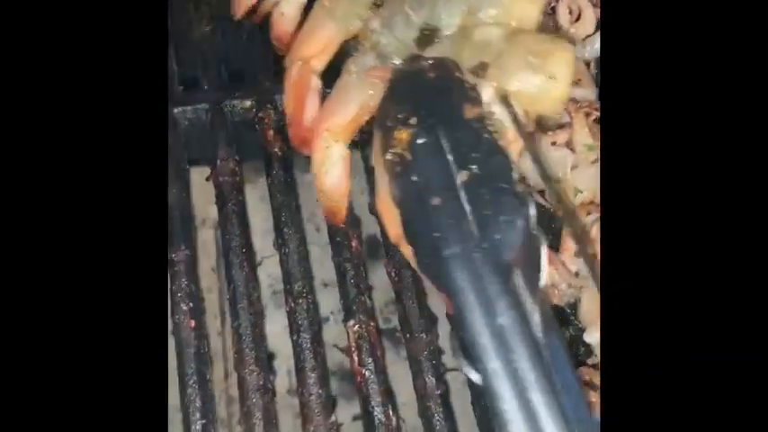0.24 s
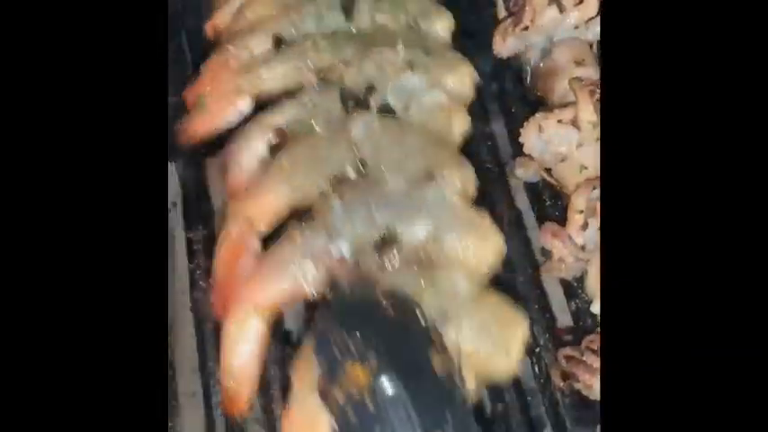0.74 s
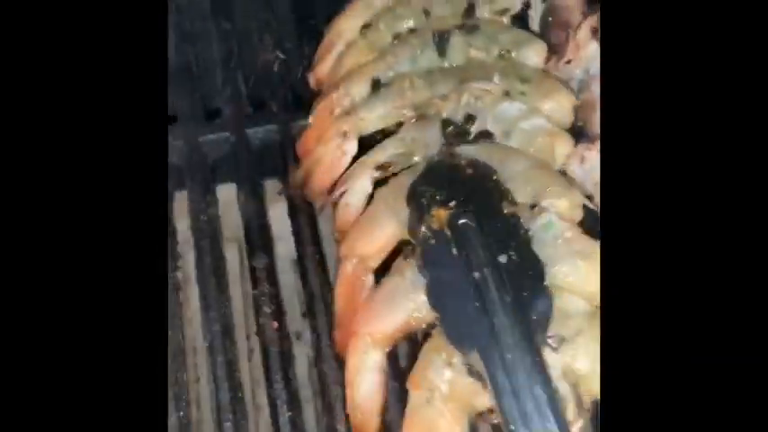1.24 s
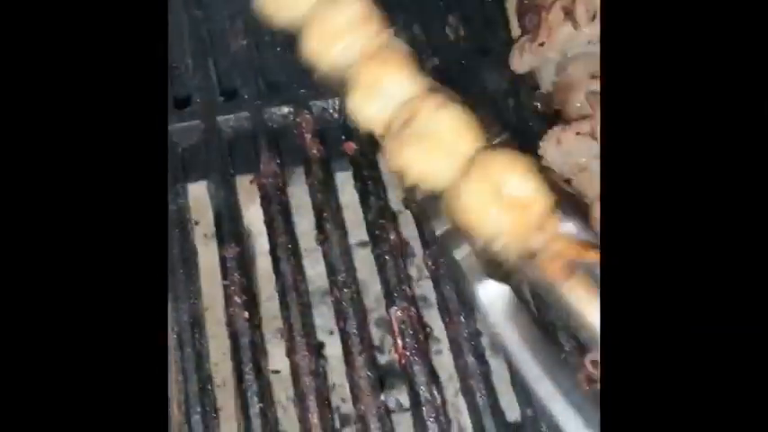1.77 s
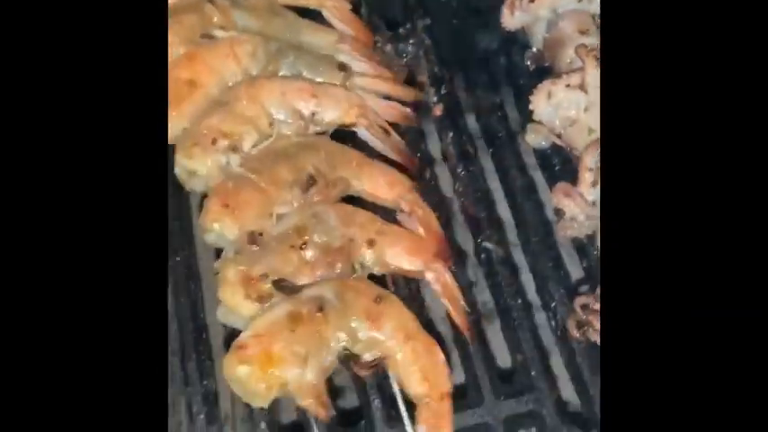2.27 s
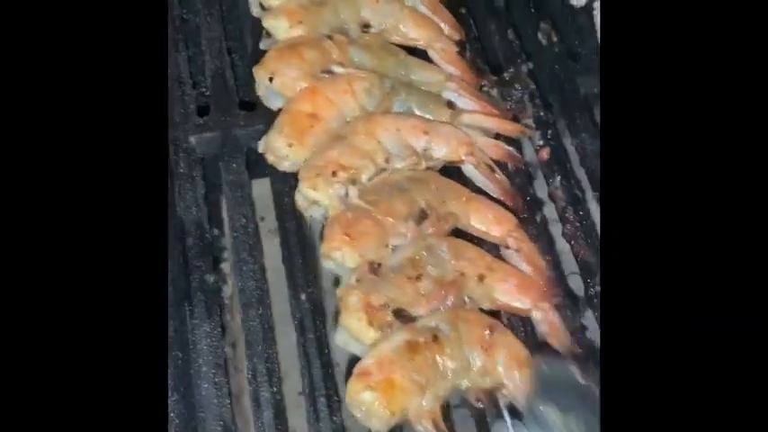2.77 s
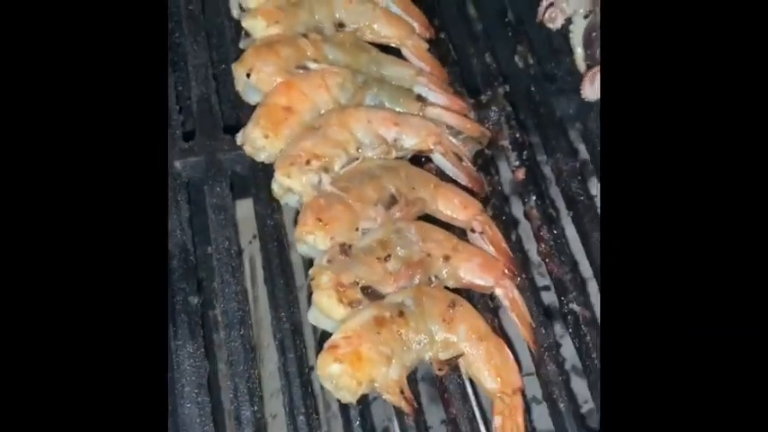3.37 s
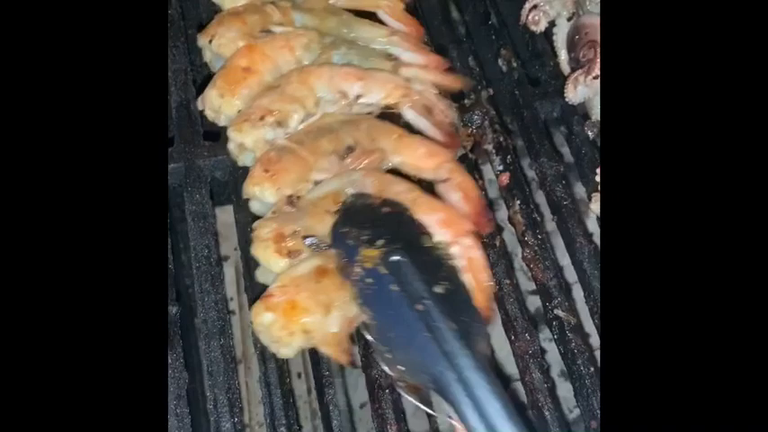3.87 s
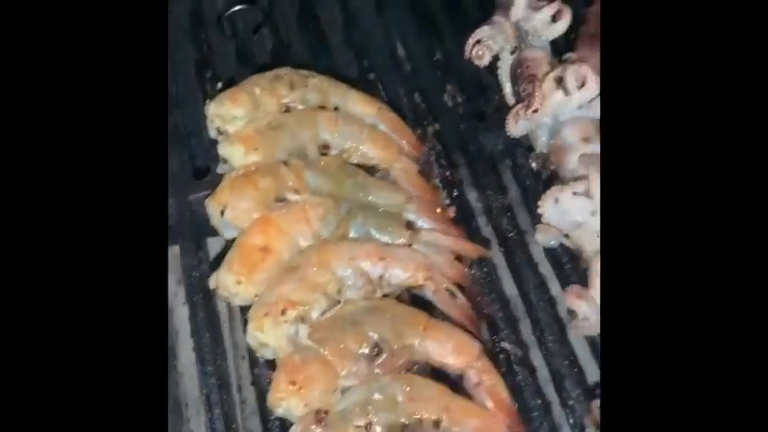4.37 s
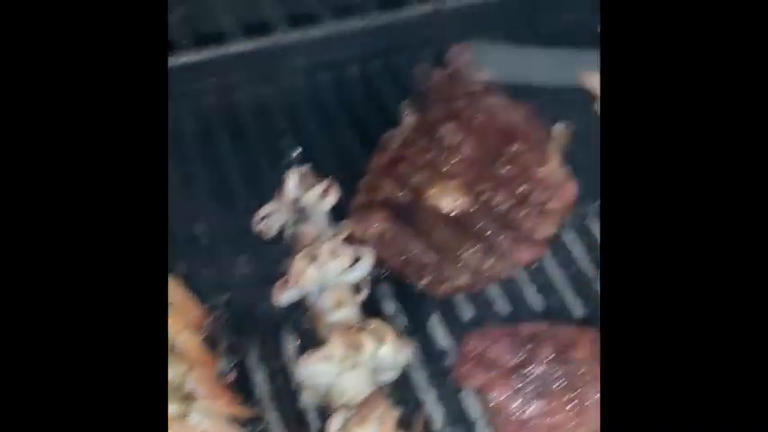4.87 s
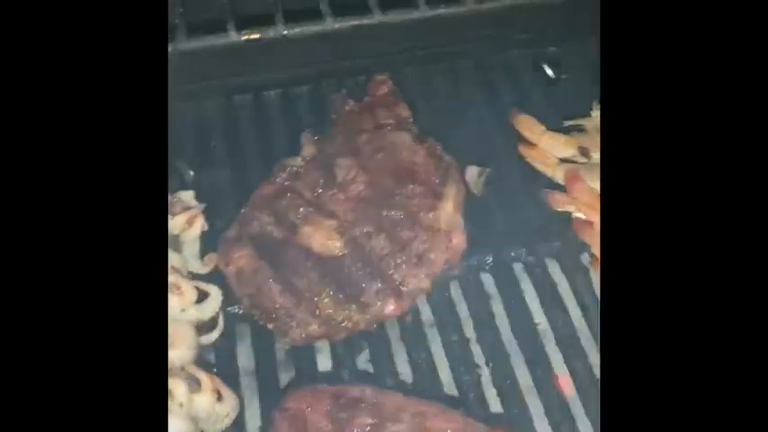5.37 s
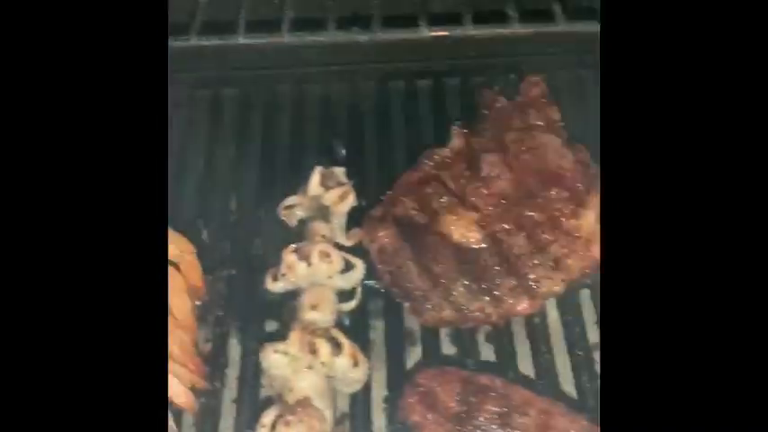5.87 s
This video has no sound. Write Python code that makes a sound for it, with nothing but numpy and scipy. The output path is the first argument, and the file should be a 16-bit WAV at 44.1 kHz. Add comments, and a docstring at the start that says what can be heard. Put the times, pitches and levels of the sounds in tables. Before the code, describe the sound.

A close stereo microphone over a hot grill catches bright steamy hiss, tiny bubbling and snapping fat. Steel tongs give high, brief clicks and gritty scrapes, and thump the metal bars with boomy, rattling knocks, busiest between two and three and a half seconds. A low burner roar and light breeze sit underneath. Contacts thin out later, leaving sizzling and pops, and loud hits slightly press the level down.

```python
"""Shrimp sizzle on a hot grill outdoors: bubbling hiss with fat pops, each a snap of noise and a longer spray.
Steel tongs click, scrape along the bars and knock the grate: noise bursts and rubbing drive steel resonances,
and blows set off decaying sine modes, the long bar tone humming on. Breeze and burner rumble below as shaped noise.
Two close microphone ports, gain control and a hard ceiling take it all in."""
import sys
import numpy as np
from scipy import signal
from scipy.fft import rfft, irfft, next_fast_len
from scipy.io import wavfile
from scipy.ndimage import uniform_filter1d, map_coordinates

SR = 44100
rng = np.random.default_rng(int(sys.argv[2]) if len(sys.argv) > 2 else 0)


def decibels_to_gain(level_db):
    """Convert a level in decibels to a linear amplitude gain (20 dB per decade)."""
    exponent = np.asarray(level_db, float) / 20
    return 10 ** exponent


def waveform_to_disk(signal):
    """Save audio, clipped to [-1, 1], as 16-bit WAV at the path in sys.argv[1]."""
    frames = np.transpose(np.atleast_2d(signal))
    scaled = np.clip(frames, -1, 1) * 32767
    samples = np.round(scaled).astype(np.int16)
    wavfile.write(sys.argv[1], SR, samples)


N = 269773
T = np.arange(N) / SR

# burner and breeze outdoors: (time [s], burner and air level [dB], breeze level [dB])
OUTDOOR_LEVELS = [(0.0, -35.5, -41), (0.31, -35.5, -47), (0.55, -36, -43), (0.7, -31, -46),
                  (1.2, -32.5, -44), (1.85, -35.5, -44.5), (2.11, -31, -31), (2.5, -34, -44),
                  (2.71, -26.5, -52), (2.86, -30.5, -35.5), (3.15, -32.5, -51), (3.49, -29.5, -37),
                  (3.75, -33.5, -39), (4.1, -34, -48), (4.4, -35, -40.5), (4.75, -37.5, -45.5),
                  (5.0, -38, -39.5), (5.22, -36.5, -30.5), (5.36, -40.5, -40.5), (5.6, -40, -37.5),
                  (6.12, -40.5, -46.5)]
# tone of the burner and far air: (frequency [Hz], relative level [dB])
AIR_SPECTRUM = [(65, -38), (110, 1), (183, 0.5), (244, -14.5), (279, -3), (639, -8), (1550, -12.5),
                (1670, -15.5), (1830, -12), (2360, -17.5), (4000, -34), (5200, -67), (8800, -120)]
# tone of the breeze: (frequency [Hz], relative level [dB])
RUMBLE_SPECTRUM = [(13, -41), (22, -22), (54, 4.5), (96, 0.5), (134, 1), (200, -31), (260, -44),
                   (440, -120)]
# modes of the grate, first the body's boom, second the long bar tone:
# (frequency [Hz], relative level [dB], time to fall 60 dB [s])
GRATE_MODES = [(150, 0.5, 0.28), (241.4, 5, 1.91), (297.5, -9, 0.43), (326, -6, 0.43), (412, -6, 0.15),
               (480, -10.5, 0.15), (584, -15, 0.16), (667, -25, 0.38), (687, -24, 0.96), (788, -18, 0.5),
               (841, -18.5, 0.24), (955, -13, 0.2), (1147, -20, 0.24), (1227, -18.5, 0.18),
               (1470, -15.5, 0.14), (1662, -18, 0.29), (1774, -18, 0.2), (1870, -19, 0.22),
               (2076, -14.5, 0.044), (2196, -21, 0.5), (2270, -18, 0.11), (2915, -20, 0.12)]
# tongs, four modes of the hinge end, then the long arms: (frequency [Hz], width [Hz], relative level [dB])
TONGS_MODES = [(4100, 15, 3), (4380, 25, -6), (9950, 240, -8), (13500, 400, -9), (3350, 240, -8),
               (5150, 186, 0.5), (5590, 320, -6.5), (6130, 33, -9.5), (6370, 30, -3), (7400, 220, -10)]
# tongs dragging over the bars:
# (start [s], length [s], tongs ringing level [dB], bar rasp level [dB], bar drone level [dB])
SCRAPE_STROKES = [(0.557, 0.16, -35.5, -25, -26.5), (1.678, 0.086, -37.5, -57, -39),
                  (1.735, 0.14, -36, -34, -33.5), (1.942, 0.076, -36, -51, -27.5),
                  (2.016, 0.1, -23, -22.5, -22), (2.622, .1, -41, -17.5, -28), (3.009, 0.18, -24, -44, -65),
                  (3.327, 0.13, -28, -31, -33), (3.44, 0.11, -19.5, -29, -41), (4.244, 0.16, -29, -44, -62),
                  (5.299, 0.048, -34, -29, -45)]
# knocks on the grate: (time [s], boom level [dB], bar tone level [dB], rattle drive [dB], thud drive [dB],
# frequency of the mode the struck spot favours [Hz])
GRATE_KNOCKS = [(0.599, -40, -58, -47, -32, 456), (0.636, -24.5, -59, -50, -52, 412),
                (0.813, -12.5, -29, -21.5, -22, 1147), (1.012, -26, -33.5, -54, -33, 788),
                (1.907, -22, -38.5, -52, -35, 788), (1.96, -31, -54, -42.5, -37, 786),
                (2.054, -20, -47, -29, -29, 410), (2.09, -38, -57, -36, -52, 1455),
                (2.2, -24, -58, -38, -43, 690), (2.39, -45, -51, -40.5, -47, 1227),
                (2.554, -11.5, -35, -40, -34.5, 316), (2.655, -10, -29.5, -24.5, -14, 583),
                (2.7, -32, -22.5, -27.5, -24.5, 1647), (3.297, -9, -28.5, -29, -15, 1470),
                (3.31, -26, -38, -35.5, -31, 830), (3.36, -16, -20, -35.5, -24, 955),
                (3.409, -14, -47, -34, -27, 1470), (3.434, -20, -46, -39.5, -29, 780),
                (3.521, -25, -49, -44, -47, 1470), (3.569, -18, -52, -39.5, -26, 326),
                (3.621, -24.5, -52, -38.5, -26.5, 750), (3.99, -46, -47, -42, -42, 790),
                (4.205, -16, -23, -27.5, -16.5, 1147), (5.198, -40, -48, -53, -47, 605),
                (6.077, -24, -30, -27.5, -13.5, 341.6)]
# tong contacts: (peak time [s], build-up [s], time to fall 60 dB [s], crack level [dB], dull tap level [dB],
# loudest ring frequency [Hz], loudest ring level [dB])
TONG_CLICKS = [(.115, 0.0024, 0.053, -10, -30, 4100, -7.5), (0.1218, 0.007, 0.025, -10.5, -39, 4600, -7),
               (0.138, .003, 0.016, -19, -53, 4380, -16), (0.724, 0.0076, 0.041, -20.5, -45, 4300, -34),
               (0.7859, 0.0011, 0.015, -10, -22, 5240, 3), (0.7905, 0.0048, 0.034, -11, -25, 4630, -6),
               (0.7974, 0.00092, 0.017, -20, -15, 4460, 1), (0.8039, 0.0044, 0.034, -10, -5, 5210, -10),
               (0.808, 0.00092, 0.021, -7.5, -2.5, 3750, 1.5),
               (0.8126, 0.0038, 0.038, -9.5, -6.5, 4470, -6.5), (0.821, 0.0017, 0.024, -17, -16, 4450, -7),
               (1.0142, 0.002, 0.011, -13, -37, 4500, -6.5),
               (1.206, 0.00093, 0.027, -13.5, -45, 4400, -10.5), (1.2639, .001, 0.017, -8.5, -41, 4520, -7),
               (1.7225, 0.013, 0.02, -20.5, -45, 4330, -16.5), (1.773, 0.0076, 0.021, -8, -27, 6500, -11.5),
               (1.775, 0.0056, 0.03, -28, -28, 4376, -14.5), (1.8584, 0.017, 0.051, -12, -26.5, 5180, -20),
               (1.879, 0.00092, 0.024, -10, -31, 4450, -11.5), (1.974, 0.014, 0.079, -30, -46, 4380, -18),
               (2.007, .001, 0.013, -23, -27, 5000, -14), (2.0135, 0.001, 0.029, -8.5, -20, 4430, -6),
               (2.0242, 0.0028, .045, -29, -40, 4420, -10), (2.0463, 0.0074, 0.092, -19.5, -38, 4970, -24),
               (2.057, 0.0042, .04, -12, -34, 5000, -7), (2.0657, .001, 0.071, -9, -20, 5070, -5.5),
               (2.093, .001, 0.017, -8.5, -40, 7300, -25), (2.0965, 0.004, 0.028, -13, -38, 4860, -14),
               (2.5304, .004, 0.038, -5.5, -19, 4680, -12), (2.545, 0.0051, 0.051, -22, -28, 4520, -15),
               (2.5992, 0.0091, 0.041, -25, -36, 5320, -16), (2.6551, 0.0062, 0.051, -5, -2, 6090, 1.5),
               (2.659, 0.0028, 0.074, -20, -12.5, 4510, -10), (2.689, 0.0004, 0.06, -5, -26, 5100, -15),
               (2.704, 0.0041, .04, -19.5, -30, 7170, -16), (2.73, 0.0079, 0.048, -21, -44, 5150, -14),
               (3.0638, 0.0052, 0.039, -16, -38, 5260, -10), (3.083, .002, .03, -25, -42, 5200, -22),
               (3.114, 0.0048, 0.025, -23, -38, 5200, -10), (3.127, 0.0018, 0.059, -8.5, -34, 4640, -12),
               (3.173, 0.013, 0.059, -17, -48, 4540, -16), (3.29, 0.00094, 0.056, -6, -16, 4660, -5.5),
               (3.35, 0.0056, 0.043, -14, -47, 7210, -24), (3.395, 0.004, 0.064, -21, -34, 5720, -12),
               (3.41, .002, .025, -16, -42, 3430, -18), (3.427, 0.0038, 0.024, -30, -43, 5330, -20),
               (3.457, 0.0023, 0.026, -30, -40, 5640, -13), (3.472, .008, 0.04, -19, -27, 5350, -12),
               (3.4948, 0.0051, 0.049, -15, -38, 5550, -27), (3.5208, 0.0036, 0.063, -21.5, -22, 7180, -5),
               (3.5378, .002, 0.098, -10, -38, 6670, -9), (3.5608, 0.0032, 0.21, -21, -40, 6160, -16),
               (3.578, 0.0049, .05, -16, -43, 4520, -16), (3.634, .003, 0.03, -35, -43, 6100, -31),
               (3.789, 0.0041, 0.086, -22, -21, 4700, -35), (3.801, 0.0026, 0.062, -23, -21, 4870, -32),
               (4.1492, .001, 0.025, -27, -48, 5150, -9), (4.1918, 0.0028, 0.033, -19, -23, 5550, -11),
               (4.291, 0.0024, 0.035, -25, -45, 5400, -18), (4.3218, 0.0011, 0.088, -9.5, -34, 4590, -18),
               (4.334, 0.0049, 0.066, -10, -34, 5050, -17.5), (4.3492, 0.0099, 0.11, -9, -34, 5220, -5.5),
               (4.3748, 0.0065, 0.038, -12.5, -33, 2960, -19.5),
               (5.3245, 0.0066, 0.071, -13.5, -12.5, 1904, -11.5),
               (5.3292, 0.004, 0.022, -3.5, -20, 3360, -13.5),
               (5.3423, 0.0023, 0.023, -15.5, -14.5, 3540, -8),
               (5.3513, 0.005, 0.087, -17, -31, 1600, -18.5), (5.463, .003, 0.07, -22, -31, 1370, -27.5),
               (6.077, 0.0034, 0.05, -42, -42, 1630, -26)]
# tone of the broad crack of steel: (frequency [Hz], relative level [dB])
CRACK_SPECTRUM = [(500, -15.5), (2000, -16.5), (4000, -2), (8000, -1), (12000, -2), (15600, -1.5)]
# the loudest fat pops: (time [s], snap level [dB])
FAT_POPS = [(0.412, -12), (1.168, -20), (1.7358, -11), (2.408, -8), (2.451, -5), (3.695, -12), (3.722, -4),
            (3.929, -5.5), (3.959, -13.5), (3.981, -11.5), (4.009, -17), (4.08, -9.5), (4.185, -11),
            (4.5445, -5.5), (4.554, -7), (4.715, -8.5), (4.9387, -11.5), (5.029, -12), (5.097, -15),
            (5.5796, -7)]
# sizzling fat: (time [s], fine sizzle level [dB], coarse sizzle level [dB])
SIZZLE_LEVELS = [(0.0, -24, -30), (0.31, -26, -31), (0.72, -21.5, -28.5), (0.89, -28, -32),
                 (1.17, -17, -26.5), (1.35, -24, -31.5), (1.95, -23, -29), (2.45, -17, -26),
                 (2.71, -19, -22.5), (2.86, -16, -26.5), (3.1, -16, -24.5), (3.32, -19, -25),
                 (3.5, -14, -23.5), (3.75, -19, -27.5), (4.38, -21, -26.5), (4.6, -19.5, -24),
                 (5.19, -22.5, -28.5), (5.41, -27, -31), (5.5, -22.5, -27.5), (5.95, -26, -32.5),
                 (6.12, -25.5, -28)]
# tone of hiss and pops: (frequency [Hz], relative level [dB])
FIZZ_SPECTRUM = [(1500, -24), (3000, -9.5), (4500, -3.5), (7000, -3), (10000, 0), (13000, 1), (15600, 2)]
# how alike the two ports sound: (frequency [Hz], likeness [-1 to 1])
PORT_LIKENESS = [(30, 0.95), (60, 0.96), (200, 0.99), (400, 0.98), (800, 0.036), (2500, 0.44), (4200, 0.94),
                 (6000, 0.76), (15000, 1)]
# how far the left port runs ahead: (frequency [Hz], phase lead [radians])
PORT_LEAD = [(0, -0.5), (180, 0.26), (350, -1.5), (700, -1.8), (1300, -0.6), (2200, 1.4136), (4450, 2.5),
             (15400, 19.5)]

TICKLE_DB = -10.5  # faint bar ringing under spitting fat, over the burner and air
# scrapes: exponent of the swell; hinge ring and hiss over arm ring
STROKE_ROUND, DRAG_HINGE_DB, DRAG_HISS_DB = 1.4, -27, -1.5
# knocks: upper modes over rattle drive; loose bars over thud and rattle drive, and their dying time
UPPER_MODES_DB, LOOSE_LOW_DB, LOOSE_HIGH_DB, LOOSE_T60_S = 12.5, 2.5, 6, 0.15
# boost near the favoured mode, its width as a log pitch ratio; wavering of each mode
FAVOUR_DB, FAVOUR_REACH, FLUTTER_DB = 13, 0.046, 4.5
WANDER = 2.2  # random phase drift of a mode, radians rms after a second
BAR_STEADY = .4  # the long bar tone wavers this share of what the other modes do
BAR_SPREAD = 0.0097  # relative pitch scatter of the upper modes from blow to blow
PRESS_S, PRESS_DB_PER_S = 3.56, 150  # the tongs come to rest on the bar and choke its tone
# clicks: other modes under the loudest ring; its random phase drift, radians rms after a second
HINGE_DB, ARMS_DB, RING_WANDER = -14, -10, 18.5
STRIKE_DB, STRIKE_T60_S = 0, 0.0055  # the hard first touch over the crack
CHATTER_DB, CHATTER_S = 3.5, .0007  # tiny impacts within a contact: spread of sizes, spacing
POP_T60_S, SPRAY_T60_S, SPRAY_DB = 0.0026, 0.042, -5  # the snap, and the spray after it
SMALL_POP_DB, SMALL_POP_SPREAD_DB = -20.5, 7  # weak pops: middle level, reach either way
# gain control: where it starts, how hard, how long it remembers
DUCK_FROM_DB, DUCK_RATIO, DUCK_MEMORY_S = -18, 0.26, 0.25
TOP_HZ = 15750


def unit(x):
    """Scale to rms 1."""
    return x / np.sqrt(np.mean(x ** 2) + 1e-20)


def along(points, hz):
    """Read (Hz, value) points on a log frequency axis."""
    f, v = np.transpose(points)
    return np.interp(np.log(hz + 1), np.log(f + 1), v)


def curves(rows):
    """One value per sample for each column after the time."""
    s, *cols = np.transpose(rows)
    return [np.interp(T, s, c) for c in cols]


def wobble(rate):
    """A smooth random curve, rate knots a second."""
    knots = rng.standard_normal(int(N * rate / SR) + 4)
    return map_coordinates(knots, [T * rate])


def filtered(x, response, even=False):
    """x times a complex response of frequency; even keeps the power of white noise."""
    m = next_fast_len(N + SR // 2)
    gain = response(np.fft.rfftfreq(m, 1 / SR))
    if even:
        gain = gain / np.sqrt(np.mean(np.abs(gain) ** 2))
    return irfft(rfft(x, m) * gain, m)[..., :N]


def coloured(x, spectrum):
    """x through a spectrum, silent from 1.5 times its top frequency."""
    return filtered(x, lambda hz: decibels_to_gain(along(spectrum, hz)) * (hz < 1.5 * spectrum[-1][0]), even=True)


def resonant(x, peaks):
    """x rings a set of (Hz, width in Hz, dB) resonances, summed with alternating sign."""
    def modes(f):
        """Complex response of all the resonances."""
        total = 0
        for k, (centre, width, db) in enumerate(peaks):
            damping = 1j * f * width
            total = total + (-1) ** k * decibels_to_gain(db) * damping / (centre * centre - f * f + damping)
        return total
    return filtered(x, modes, even=True)


def grit(per_s, spread_db):
    """Random spikes with a long tail of sizes, rms 1."""
    when, sign, size = rng.random((3, N))
    return unit((when < per_s / SR) * np.sign(sign - .5) * decibels_to_gain(-spread_db * np.log(1 - size)))


def blotched(x, depth_db, nperseg):
    """x with patches of random gain in time and frequency, rms 1."""
    z = signal.stft(x, nperseg=nperseg)[2]
    across_pitch = 6 if nperseg == 512 else 4
    field = uniform_filter1d(rng.standard_normal(z.shape), across_pitch, axis=0)
    field = uniform_filter1d(field, 10, axis=1)
    return unit(signal.istft(z * decibels_to_gain(depth_db * unit(field)), nperseg=nperseg)[1][:N])


def patchy(depth_db):
    """White noise with patches of random gain."""
    return blotched(rng.standard_normal(N), depth_db, nperseg=512)


def bars(lowest, highest):
    """The grate's modes, damped by the steel that touches them, as resonances."""
    return [(hz, 7 / t60 + 0.043 * hz, db) for hz, db, t60 in GRATE_MODES if lowest < hz < highest]


def steel(crack, hinge, arms, rasp):
    """Four excitations drive the steel: broad crack, hinge modes, arm modes and the grate's upper bars."""
    crack = decibels_to_gain(2.0) * coloured(crack, CRACK_SPECTRUM)
    hinge = decibels_to_gain(4.5) * resonant(hinge, TONGS_MODES[:4])
    arms = decibels_to_gain(6.0) * resonant(arms, TONGS_MODES[4:])
    rasp = decibels_to_gain(-3.5) * resonant(rasp, bars(1000, 4000))
    return crack + hinge + arms + rasp


def outdoors(air_db, breeze_db):
    """Burner roar and far air as patchy noise, over a lumpy low breeze."""
    air = decibels_to_gain(air_db + 1.9 * wobble(16)) * unit(coloured(patchy(depth_db=3.5), AIR_SPECTRUM))
    breeze = decibels_to_gain(breeze_db + 2.1 * wobble(11)) * coloured(rng.standard_normal(N), RUMBLE_SPECTRUM)
    return air + breeze


def tickle(air_db):
    """Spitting fat and shifting food tap the bars lightly: their upper modes come and go."""
    modes = [(hz, 1.8 / t60 + 8, db + rng.normal(0, 3)) for hz, db, t60 in GRATE_MODES if hz > 400]
    ringing = resonant(grit(500, spread_db=2.5), modes)
    return decibels_to_gain(air_db + TICKLE_DB) * blotched(ringing, 5.4, nperseg=1024)


def scrapes():
    """Steel catching on burnt crust: each stroke swells and fades, gritty and stuttering, into tongs and bars."""
    arms, rasp, drone = np.zeros((3, N))
    for start, length, arms_db, rasp_db, drone_db in SCRAPE_STROKES:
        swell = np.sin(np.pi * np.clip((T - start) / length, 0, 1)).clip(0) ** STROKE_ROUND
        arms += decibels_to_gain(arms_db) * swell
        rasp += decibels_to_gain(rasp_db) * swell
        drone += decibels_to_gain(drone_db) * swell
    stutter = decibels_to_gain(1.34 * wobble(120) + 4.3 * wobble(35))
    # one shared train of grit, with its own noise for each part
    rub = unit(stutter * (rng.standard_normal((5, N)) + 0.87 * grit(600, spread_db=3.5)))
    rub = rub * [decibels_to_gain(DRAG_HISS_DB) * arms, decibels_to_gain(DRAG_HINGE_DB) * arms, arms, rasp, drone]
    return steel(*rub[:4]) + resonant(rub[4], bars(300, 1000))


def knocks():
    """A blow sets the grate's modes off at new strengths, over a rough thud of loose bars."""
    out, thud, t = np.zeros(N + SR), np.zeros((2, N + SR)), np.arange(SR) / SR
    hz, level, t60 = np.array(GRATE_MODES).T[:, :, None]
    for s, boom_db, bar_db, rattle_db, thud_db, spot_hz in GRATE_KNOCKS:
        near = np.exp(-(np.log(hz / spot_hz) / FAVOUR_REACH) ** 2)
        strength = level + rng.normal(0, 2.96, hz.shape) + FAVOUR_DB * near
        strength = strength + np.where(hz > 500, rattle_db + UPPER_MODES_DB, thud_db)
        strength[:2, 0] = boom_db, bar_db

        # scattered pitches, the favoured mode pulled to the struck spot's own
        pitch = hz * (1 + BAR_SPREAD * (hz > 300) * rng.standard_normal(hz.shape))
        pitch = pitch + near * (spot_hz - pitch)

        knots = rng.standard_normal((len(hz), 31))
        flutter = FLUTTER_DB * np.array([np.interp(t, np.arange(31) / 30, k) for k in knots])
        drift = WANDER * np.cumsum(rng.standard_normal((len(hz), SR)), 1) / np.sqrt(SR)
        drift = drift + rng.uniform(0, 2.67, hz.shape)
        choke_db = PRESS_DB_PER_S * (s < PRESS_S) * np.clip(s + t - PRESS_S, 0, None)
        flutter[1] = BAR_STEADY * flutter[1] - choke_db
        # a new blow feeds the tone already ringing
        drift[1] = BAR_STEADY * drift[1] + 2 * np.pi * pitch[1] * s

        modes = decibels_to_gain(strength + flutter - 60 * t / t60) * np.sin(2 * np.pi * pitch * t + drift)
        start, rise = round((s - .004) * SR), 1 - np.exp(-t / 0.0018)
        out[start:][:SR] += rise * modes.sum(0)
        loose_db = np.array([[thud_db + LOOSE_LOW_DB], [rattle_db + LOOSE_HIGH_DB]])
        rough = decibels_to_gain(loose_db - 60 * t / LOOSE_T60_S) * rng.standard_normal((2, SR))
        thud[:, start:][:, :SR] += rise * rough
    loose_low = resonant(thud[0, :N], bars(200, 700))
    loose_high = resonant(thud[1, :N], bars(700, 2200))
    return out[:N] + loose_low + loose_high


def clicks():
    """Each contact builds up and dies: a broad crack, tongs ringing on one mode above the rest, a dull bar tap."""
    tracks, t = np.zeros((5, N + SR)), np.arange(SR // 5) / SR
    for s, build, t60, crack_db, tap_db, ring_hz, ring_db in TONG_CLICKS:
        shape = np.where(t < build, t / build, decibels_to_gain(-60 * (t - build) / t60))
        jolt = rng.standard_normal((5, len(t)))  # crack, hinge, arms, tap, loudest ring
        knots = rng.standard_normal(int(t[-1] / CHATTER_S) + 2)
        chatter = np.interp(t / CHATTER_S, np.arange(len(knots)), knots)
        jolt[:4] *= decibels_to_gain(CHATTER_DB * (chatter - .5))
        drift = RING_WANDER * np.cumsum(jolt[4]) / np.sqrt(SR)
        jolt[4] = np.sin(2 * np.pi * ring_hz * t + drift)
        jolt[0] += decibels_to_gain(STRIKE_DB - 60 * np.abs(t - build) / STRIKE_T60_S) * np.sign(jolt[0])
        db = [[crack_db], [ring_db + HINGE_DB], [ring_db + ARMS_DB], [tap_db], [ring_db]]
        tracks[:, round((s - build) * SR):][:, :len(t)] += decibels_to_gain(db) * shape * jolt
    return steel(*tracks[:4, :N]) + tracks[4, :N]


def pops():
    """Bursting fat: a very short snap of noise and a longer spray, with many weak pops at random."""
    out, t = np.zeros(N + SR), np.arange(SR // 20) / SR
    small = [(s, SMALL_POP_DB + 2 * SMALL_POP_SPREAD_DB * (u - .5))
             for s, u in rng.random((60, 2)) * [N / SR, 1]]
    for s, db in FAT_POPS + small:
        snap = decibels_to_gain(db - 60 * t / POP_T60_S)
        spray = decibels_to_gain(db + SPRAY_DB - 60 * t / SPRAY_T60_S)
        out[round(s * SR):][:len(t)] += (snap + spray) * rng.standard_normal(len(t))
    return coloured(out[:N], FIZZ_SPECTRUM)


def froth():
    """One independent bed of steam hiss, bubble spikes and short bursts, in flurries."""
    flurry = decibels_to_gain(0.25 * wobble(17) + 1.48 * wobble(40))
    bursts = signal.lfilter([1], [1, -.97], np.abs(grit(150, spread_db=3.5))) * rng.standard_normal(N)
    spikes = grit(3000, spread_db=1.5)
    bed = patchy(depth_db=2.5) + decibels_to_gain(-10.5) * spikes + decibels_to_gain(-8.5) * unit(bursts)
    return unit(flurry * bed)


def sizzle(fine_db, coarse_db):
    """Steam hiss with tiny bursting bubbles, small ones high, large ones lower, and pops that leave spray."""
    def high(hz):
        """Share of the power given to the fine sizzle, half at 8.5 kHz."""
        return 1 / (1 + (8500 / (hz + 1)) ** 6)
    fine = unit(filtered(coloured(froth(), FIZZ_SPECTRUM), lambda hz: np.sqrt(high(hz))))
    coarse = unit(filtered(coloured(froth(), FIZZ_SPECTRUM), lambda hz: np.sqrt(1 - high(hz))))
    return decibels_to_gain(fine_db) * fine + decibels_to_gain(coarse_db) * coarse + pops()


def ports(x, other):
    """Two ports: the treble reaches them out of step, the middle partly by unlike paths off the grill."""
    def shares(f):
        """Gains of the common and the opposed part that give the ports their likeness."""
        turn = np.arccos(np.clip(along(PORT_LIKENESS, f), -1, 1)) / 2
        return np.array([np.cos(turn), np.sin(turn)])

    def leads(f):
        """Half the phase lead to the left, half the lag to the right."""
        half = np.exp(.5j * np.interp(f, *np.transpose(PORT_LEAD)))
        return np.array([half, 1 / half])
    mid, side = filtered(np.array([x, other]), shares)
    return filtered(np.array([mid + side, mid - side]), leads)


def ducked(x):
    """Gain control: the gain sinks after loud moments and creeps back."""
    keep = np.exp(-1 / (DUCK_MEMORY_S * SR))
    power = signal.lfilter([1 - keep], [1, -keep], np.mean(x ** 2, axis=0))
    return x * (1 + (power / decibels_to_gain(2 * DUCK_FROM_DB)) ** 2) ** (-DUCK_RATIO / 2)


def joint(x, gap_db, quiet_db):
    """Joint stereo: in the treble, a quiet sum or difference far below the other is dropped."""
    hz, _, z = signal.stft(np.array([x[0] + x[1], x[0] - x[1]]) / 2, SR, nperseg=2048)
    power = uniform_filter1d(uniform_filter1d(np.abs(z) ** 2, size=24, axis=1), size=2, axis=2)
    masked = power < power[::-1] * decibels_to_gain(-2 * gap_db)
    quiet = power < decibels_to_gain(2 * quiet_db)
    weak = masked & quiet & (hz[:, None] > 2500)
    mid, side = signal.istft(z * ~weak, SR, nperseg=2048)[1][:, :N]
    return np.array([mid + side, mid - side])


def scene():
    """Everything heard at the two ports; near sounds also come back scattered from the lid."""
    fine_db, coarse_db = curves(SIZZLE_LEVELS)
    air_db, breeze_db = curves(OUTDOOR_LEVELS)
    near = tickle(air_db) + scrapes() + knocks() + clicks() + sizzle(fine_db, coarse_db)
    # flat spectrum, random delays: the lid smears without colouring
    lid = irfft(np.exp(1j * np.cumsum(rng.normal(-.3, 0.35, 1025))))
    scattered = signal.fftconvolve(near, lid)[:N]
    return ports(near + outdoors(air_db, breeze_db), scattered + outdoors(air_db, breeze_db))


def band_limit(x):
    """A steep low-pass at the top of the band."""
    return signal.sosfilt(signal.butter(12, 16330, fs=SR, output="sos"), x)


def record(dry):
    """Gain control, band limit, joint stereo, then a hard ceiling on the loudest peaks."""
    limited = filtered(ducked(dry), lambda hz: 1 / (1 + (hz / TOP_HZ) ** 500))
    x = joint(limited, gap_db=6.5, quiet_db=-52.5)
    mix = x / (1 + np.abs(x / 0.93) ** 12) ** (1 / 12)
    return band_limit(mix)


dry = scene()
out = record(dry)
waveform_to_disk(out)
```